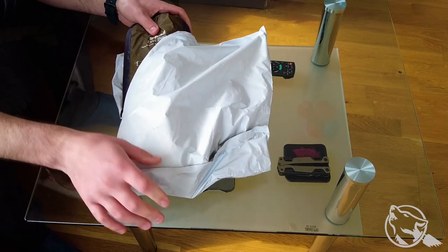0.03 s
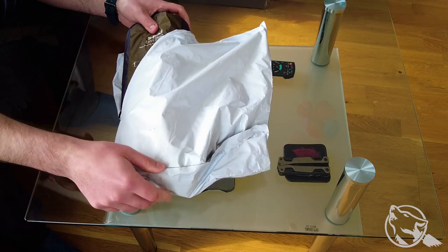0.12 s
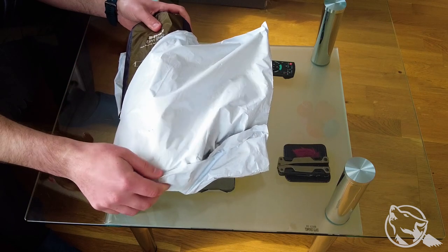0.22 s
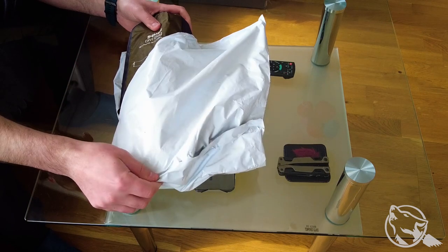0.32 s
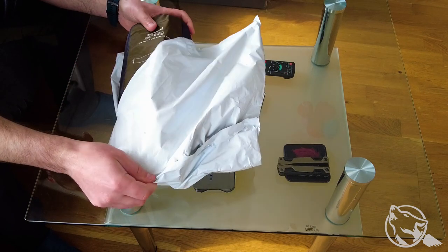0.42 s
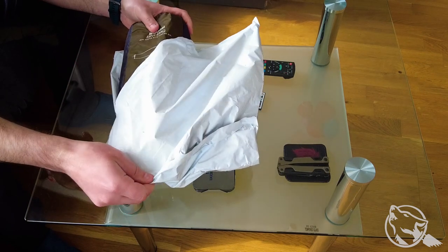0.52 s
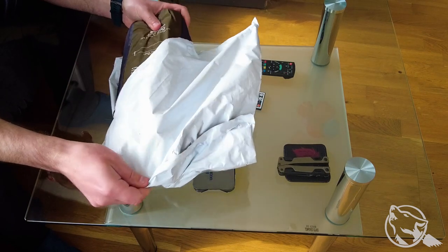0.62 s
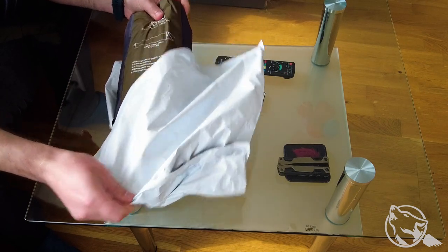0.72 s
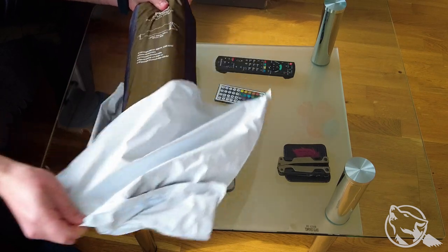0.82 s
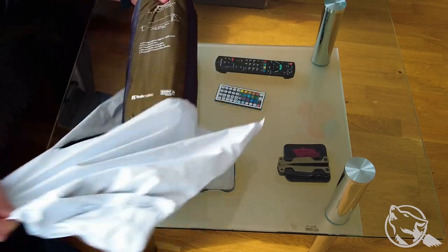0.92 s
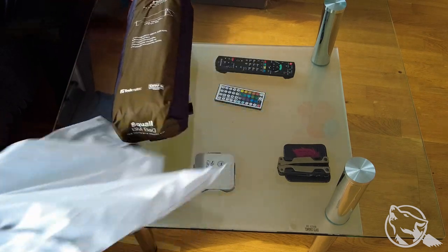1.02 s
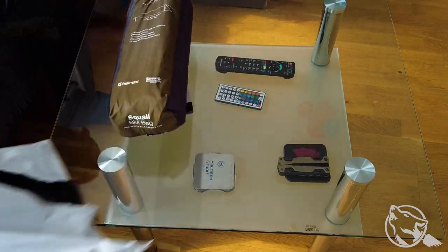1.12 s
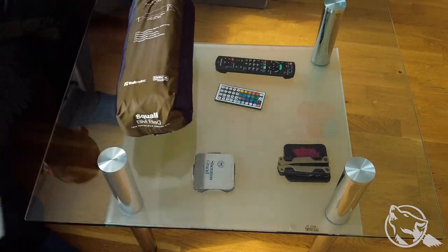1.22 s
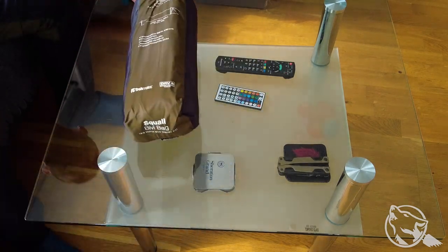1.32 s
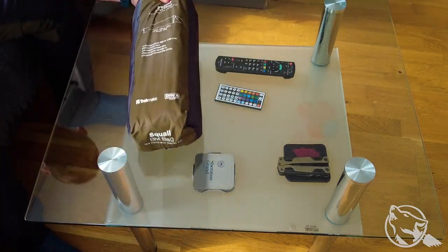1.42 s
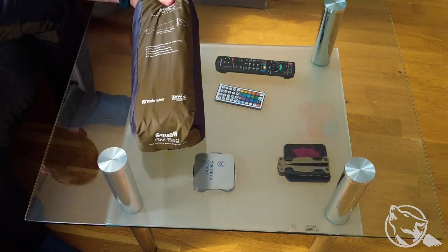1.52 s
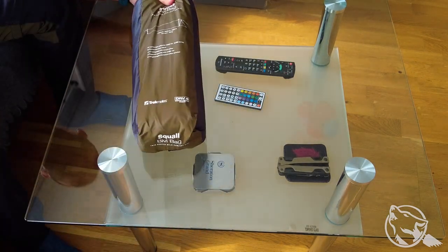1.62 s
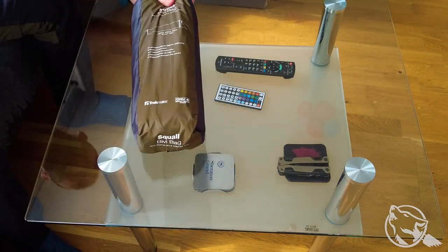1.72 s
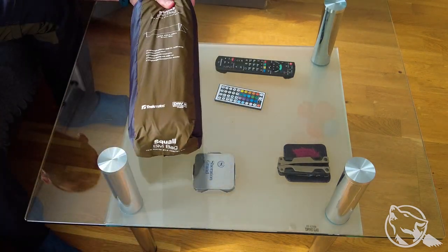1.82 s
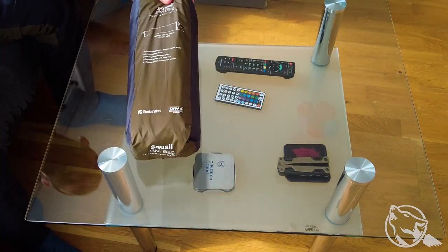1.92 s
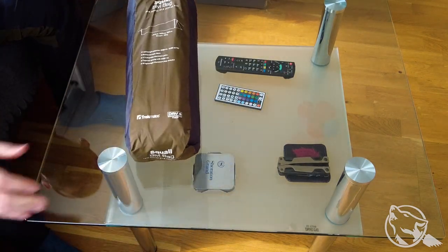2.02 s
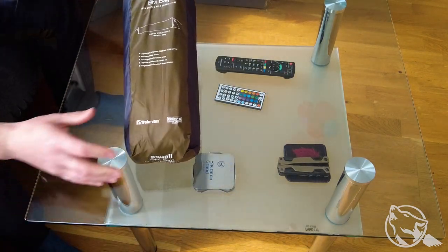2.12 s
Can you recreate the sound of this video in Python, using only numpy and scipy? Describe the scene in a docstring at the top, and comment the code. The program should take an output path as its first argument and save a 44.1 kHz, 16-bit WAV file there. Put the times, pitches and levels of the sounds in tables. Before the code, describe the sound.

Thin plastic mailer film rustles faintly at first, then from 0.2 seconds crinkles in dense bright crackles and sharp creasing snaps. It slides free with a smoother, louder swish around 0.9 to 1.1 seconds, with a soft bump, then fades by 1.4. Fabric rubs lightly from 1.5, with a crisp scuff and dull knocks near 1.85 and a faint touch at 2.15. Close, quiet room, low hum and rumble.

```python
"""Unwrapping a packed bag

A thin plastic mailer is pulled off a packed fabric bag on a glass table in a living room.
The film slides with a hiss and crackle made of random pops; creases snap through as short ringing clicks,
and folds collapse in quick clusters of pops. The mailer comes free, with a smoother swish.
The fabric bag rubs in short grainy strokes and bumps with soft, damped knocks.
The room adds a brief fading ring, over quiet air, a low hum and swells of deep rumble.
"""
import sys
import numpy as np
from scipy import signal
from scipy.fft import rfft, irfft
from scipy.io import wavfile

SR = 44100
rng = np.random.default_rng(int(sys.argv[2]) if len(sys.argv) > 2 else 0)


def put_to_file(sound):
    """Save the sound as 16-bit audio at rate SR, in the file named by the first command-line argument."""
    columns = np.atleast_2d(sound).T  # one column per channel
    safe = np.clip(columns, -1, 1)
    whole_steps = np.round(safe * 32767)
    wavfile.write(sys.argv[1], SR, whole_steps.astype(np.int16))


N = 97020  # length in samples: 2.2 s


def undb(db):
    """Turn decibels into a plain gain."""
    return 10 ** (np.asarray(db) / 20)


def unit(x):
    """Scale to an rms (average strength) of 1."""
    return x / np.sqrt(np.mean(x ** 2) + 1e-20)


def octaves(n):
    """Log2 frequency of each bin of an n-sample spectrum."""
    return np.log2(np.maximum(np.arange(n // 2 + 1) * SR / n, 1))


def curve(points, n):
    """Read a (Hz, dB) table as a gain in dB for each bin."""
    hz, db = np.array(points, float).T
    return np.interp(octaves(n), np.log2(hz), db)


def shape(x, db):
    """Filter with the given gain in each bin, without any sound ahead of its cause (minimum phase)."""
    n = len(x)
    cepstrum = irfft(np.log(undb(db)), n)
    # fold the backward half onto the forward half
    cepstrum[1:n // 2] *= 2
    cepstrum[n // 2 + 1:] = 0
    return irfft(rfft(x) * np.exp(rfft(cepstrum)), n)


def add(out, start, x):
    """Mix a short sound in at a time in seconds."""
    i = int(np.clip(start * SR, 0, N - 1))
    out[i:i + len(x)] += x[:N - i]


def pops(n, per_s, spread_db):
    """Random impulses, many small and a few large."""
    chance = rng.random(n)
    size = np.minimum(rng.exponential(size=n), 4.5)
    sign = rng.choice([-1, 1], n)
    return unit((chance < per_s / SR) * sign * undb(spread_db * size))


def catching(t, depth_db):
    """Gain of a surface that catches and slips unevenly: a random level every few milliseconds."""
    step_s = 0.007
    steps = np.arange(0, N / SR, step_s)
    wobble = np.clip(rng.standard_normal(len(steps)), -2, 2)
    return undb(depth_db * np.interp(t, steps, wobble))


CRACKLE_PER_S = 1500  # pops per second, all bands together


def crackle(n, spread_db, count=9):
    """Facets of several sizes pop independently, each size ringing in its own band."""
    centres_hz = np.linspace(1000, 10500, count)
    bin_hz = 2 ** octaves(n)
    rings = [1 + 12 * np.exp(-((bin_hz - hz) / 900) ** 2) for hz in centres_hz]
    total = np.sqrt(sum(ring ** 2 for ring in rings))  # keeps the combined colour even
    out = np.zeros(n)
    for ring in rings:
        facet_pops = pops(n, CRACKLE_PER_S / count, spread_db)
        out += shape(facet_pops, 20 * np.log10(ring / total))
    return out


# How fast the film slides over the bag, given as a loudness that glides from row to row.
# Each row: time in seconds, level in dB before the catching and the loss of treble.
SLIDE_LEVELS = [(0,-54),(.04,-50.5),(0.201,-59),(0.224,-47),(.28,-47.5),(.37,-47),(0.471,-46),(0.548,-39.5),(.60,-48.5),(.68,-45.5),(.73,-39),(.80,-44.5),(.85,-43),(.92,-43),(1.0,-41),(1.089,-39),(1.17,-52.5),(1.301,-60),(1.47,-67.5)]
# Tone colour of the plastic film, also used for its collapsing folds. Each row: frequency in Hz, gain in dB.
FILM_COLOUR = [(59, -8.5), (100, -3.5), (177, -2.5), (275, 2.5), (589, -3), (640, -2), (712, -1.5),
               (774, -0.5), (1840, -1), (3320, -6.5), (7250, -4), (9150, -9), (10800, -18.5),
               (12800, -18.5), (15500, -28)]
CRACKLE_DB, CRACKLE_SPREAD_DB, HISS_DB = -2.5, 3.5, -4  # mix of crackle and hiss, before rescaling
FREE_S, FREE_FADE_S, FREE_GRAIN = 0.87, 0.044, 0.57  # once clear of the bag the film has less grain
DULL_HZ, DULL_SLOPE_DB = 4000, -3.5  # slow film loses treble above this, in dB per octave
DULLEST_DB, BRIGHTEST_DB = -66.5, -52.5  # slide levels where the film is fully dull and fully bright
FILM_CATCH_DB = 2.1


def sliding(t):
    """The moving film hisses and crackles in step with its speed, brighter when fast and smoother once free."""
    times, levels = np.array(SLIDE_LEVELS).T
    db = np.interp(t, times, levels, right=-120)  # all but silent after the last row
    grip = 1 - (1 - FREE_GRAIN) * np.clip((t - FREE_S) / FREE_FADE_S, 0, 1)
    grain, hiss = grip * undb(CRACKLE_DB), undb(HISS_DB)
    rustle = grain * crackle(N, CRACKLE_SPREAD_DB) + hiss * rng.standard_normal(N)
    rustle /= np.hypot(grain, hiss)  # less grain does not mean less loud
    bright = unit(shape(rustle, curve(FILM_COLOUR, N)))
    dull = shape(bright, DULL_SLOPE_DB * np.maximum(octaves(N) - np.log2(DULL_HZ), 0))
    fast = np.clip((db - DULLEST_DB) / (BRIGHTEST_DB - DULLEST_DB), 0, 1)
    film = fast * bright + (1 - fast) * dull
    return undb(db) * catching(t, grip * FILM_CATCH_DB) * film


# Single creases snapping through. Each row: start in seconds, level in dB (energy spread over one
# millisecond, before the trim), ring frequency in Hz, half bandwidth in octaves.
CREASE_SNAPS = [(0.0818,-47,5460,0.36),(0.0998,-35.5,7500,0.46),(0.1532,-36.5,5200,0.2),(0.2338,-30.5,2180,0.34),(0.2374,-34.5,2400,2.5),(.2718,-39,7500,0.3),(0.3033,-36,6000,1.4),(0.3105,-30.5,6500,2.1),(.3312,-30,8000,0.21),(.340,-32,7000,0.75),(0.3514,-30.5,7500,0.46),(0.3577,-30.5,4970,1.7),(0.427,-32.5,5630,.3),(0.4333,-31.5,3000,2.6),(0.451,-24,6560,0.75),(0.451,-28,2190,0.64),(0.455,-35,7660,0.25),(0.4666,-30.5,1980,2.1),(0.4774,-26,7060,0.26),(.4953,-25,6600,.5),(0.4963,-29.5,2100,0.44),(.520,-25.5,5600,.5),(0.527,-31,5900,0.42),(0.5595,-29.5,8060,.25),(.5744,-34.5,7800,.5),(0.5825,-34,7200,0.82),(0.6057,-31.5,1900,0.41),(0.6633,-29,5600,0.96),(0.6935,-29,9000,0.56),(.744,-28.5,5000,2),(0.763,-28.5,6000,1.6),(0.7696,-31.5,6540,0.61),(.821,-30,6700,0.64),(.831,-29.5,1900,0.38),(.8394,-25.5,6550,0.81),(.9554,-31,5350,0.22),(0.9646,-36,5950,1.5),(0.9729,-18.5,7800,0.66),(1.0435,-32,6000,1.4),(1.1,-23.5,5800,0.85),(1.135,-28.5,4400,0.25),(1.2295,-42.5,3220,0.4),(1.2372,-39,9700,0.42),(1.3201,-45,2740,0.79),(1.3853,-52,4900,0.28),(1.6421,-46.5,8500,.6),(1.833,-38,6040,1.3),(1.850,-31,2000,.4),(1.857,-33.5,2000,0.52),(1.8795,-30.5,5970,0.65)]
# Tone colour shared by all the snaps. Each row: frequency in Hz, gain in dB.
CREASE_COLOUR = [(100,16),(300,0),(1800,3),(3200,-1),(5500,-3),(8500,-3),(10500,-12.5),(15500,-15.5)]
SNAP_TRIM_DB, SNAP_SKIRT_DB = -0.5, -19.5  # the skirt is the level outside the ringing band
SNAP_FLUTTER, SNAP_DECAY_S = 0.37, 0.00052


def snaps(size=2048):
    """Each crease flips with a click and a millisecond of flutter in the band of its own facet."""
    out, t = np.zeros(N), np.arange(size) / SR
    for start, db, hz, width in CREASE_SNAPS:
        push = SNAP_FLUTTER * rng.standard_normal(size) * np.exp(-t / SNAP_DECAY_S)
        push[0] = 1  # the click itself
        away = (octaves(size) - np.log2(hz)) / width
        band = 1 / (1 + away ** 4) + undb(SNAP_SKIRT_DB)
        click = shape(push, curve(CREASE_COLOUR, size) + 20 * np.log10(band))
        click *= np.sqrt(SR / 1000) / np.linalg.norm(click)  # energy of one millisecond at rms 1
        add(out, start, click * undb(db + SNAP_TRIM_DB))
    return out


# Folds collapsing in a cluster of crackles. Each row: centre in seconds, half length in seconds,
# level in dB at the top of the swell before the trim, treble tilt in dB per octave above 1000 Hz.
FOLD_CRUMPLES = [(.026,.012,-59,-17),(.225,0.0058,-39,0.5),(.237,0.0059,-34,-1),(.304,0.0032,-41,-10),(0.353,0.0084,-39,0),(0.424,0.0025,-35,0),(0.435,0.0026,-37,-1),(0.525,0.016,-37,2),(.638,.011,-44,4.5),(0.719,0.0049,-33.5,3),(.733,0.012,-37.5,-1),(.764,0.0039,-27.5,1.5),(0.83,0.0039,-31,2),(0.842,0.0094,-35,1.5),(0.861,0.017,-33.5,1.5),(0.97,0.011,-29,2),(0.9735,0.0015,-22.5,2),(1.106,0.0032,-32,5),(1.137,0.0057,-36.5,0),(1.232,0.0033,-45.5,-3.5),(1.400,0.0039,-45,-1),(1.549,0.0037,-50,-8.5),(1.848,0.0042,-30.5,6.5)]
CRUMPLE_TRIM_DB, CRUMPLE_SPREAD_DB = -3, 2


def crumples(size=8192):
    """A fold gives way in a quick swell of crackles."""
    out, t = np.zeros(N), (np.arange(size) - size / 2) / SR
    for centre, half, db, tilt_db in FOLD_CRUMPLES:
        swell = np.exp(-(t / half) ** 2)
        tilt = tilt_db * np.maximum(octaves(size) - np.log2(1000), 0)
        swelling_pops = swell * pops(size, per_s=2800, spread_db=CRUMPLE_SPREAD_DB)
        burst = unit(shape(swelling_pops, curve(FILM_COLOUR, size) + tilt))
        burst *= np.sqrt(np.mean(swell ** 2))
        add(out, centre - size / 2 / SR, burst * undb(db + CRUMPLE_TRIM_DB))
    return out


# The fabric bag rubbing on hand and table. Each row: start in seconds, attack in seconds,
# hold in seconds, decay in seconds, level in dB before the trim and the catching.
RUB_STROKES = [(1.523,.002,0.033,0.075,-58),(1.637,0.032,0.043,0.042,-49),(1.792,0.001,0.022,0.031,-44),(1.828,0.018,0.014,0.023,-39.5),(1.872,0.013,0.024,0.034,-42.5),(1.965,0.022,0.029,.08,-64),(2.15,0.0023,0.031,0.056,-60.5)]
# Tone colour of the rubbed fabric. Each row: frequency in Hz, gain in dB.
FABRIC_COLOUR = [(80,-3),(150,-7),(330,-3),(470,-10.5),(850,-1.5),(1200,-7),(2000,-3.5),(3400,-9.5),(6000,-8),(9000,-13),(11000,-22.5),(15500,-26.5)]
RUB_TRIM_DB, RUB_SPREAD_DB, RUB_CATCH_DB = -4.5, 3, 2


def rubs(t):
    """Short strokes of finely grained fabric friction."""
    effort = np.zeros(N)
    for start, attack, hold, decay, db in RUB_STROKES:
        rise = np.clip((t - start) / attack, 0, 1)
        fall = np.exp(-np.maximum(t - start - attack - hold, 0) / decay)
        effort += undb(db) * rise * fall
    grains = pops(N, per_s=3500, spread_db=RUB_SPREAD_DB)
    friction = unit(shape(grains, curve(FABRIC_COLOUR, N)))
    return undb(RUB_TRIM_DB) * effort * catching(t, RUB_CATCH_DB) * friction


# Soft knocks of the bag. Each row: start in seconds, peak level in dB, body frequency in Hz,
# decay of the scuff in seconds.
BAG_KNOCKS = [(.231,-34.5,237,0.0083),(0.972,-38.5,123,0.012),(1.102,-35.5,228,0.027),(1.3963,-41,260,0.0068),(1.833,-36,116,0.018),(1.848,-42.5,106,.02),(1.902,-39.5,91,0.015),(2.1485,-42.5,217,0.0064)]
KNOCK_WIDTH_OCT, KNOCK_SLOPE_DB = 0.94, 11.5  # far from the body frequency, dB lost per such width
KNOCK_SCUFF = 0.045


def knocks(size=8192):
    """The padded bag bumps: a dull, heavily damped push with a scuff."""
    out, t = np.zeros(N), np.arange(size) / SR
    for start, db, hz, decay in BAG_KNOCKS:
        push = KNOCK_SCUFF * rng.standard_normal(size) * np.exp(-t / decay)
        push[0] = 1  # the bump itself
        away = (octaves(size) - np.log2(hz)) / KNOCK_WIDTH_OCT
        thud = shape(push, -KNOCK_SLOPE_DB * np.sqrt(1 + away ** 2))
        add(out, start, thud / np.abs(thud).max() * undb(db))
    return out


# How the room rings, band by band. Each row: band centre in Hz, time to fade by 60 dB in seconds,
# level in dB before the noise is split into bands.
ROOM_BANDS = [(150,0.38,-9),(484,0.64,-5.5),(1480,0.77,-12),(3900,0.36,-12.5),(8000,0.76,-15.5),(14000,.33,-11.5)]
ROOM_GAP_S = 0.0044  # pause before the first reflection


def room(x, size=32768):
    """Diffuse reflections: bands of noise, each fading at its own rate."""
    t, tail = np.arange(size) / SR, np.zeros(size)
    noise = rfft(rng.standard_normal(size))
    centres = np.log2([row[0] for row in ROOM_BANDS])
    # each row of the identity matrix picks one band, cross-faded into its neighbours
    for own, (hz, t60, db) in zip(np.eye(len(ROOM_BANDS)), ROOM_BANDS):
        fade = (t > ROOM_GAP_S) * np.exp(-np.log(1000) * t / t60)
        band = irfft(noise * np.interp(octaves(size), centres, own), size)
        tail += undb(db) * band * fade / np.linalg.norm(fade)
    return signal.fftconvolve(x, tail)[:N]


# Swells of deep rumble. Each row: centre in seconds, half length in seconds, level in dB at the top.
RUMBLE_SWELLS = [(.08,0.079,-48.5),(0.23,0.032,-51),(0.422,0.082,-44),(0.69,0.065,-49),(.95,.15,-50.5),(1.635,0.075,-44.5),(1.718,0.045,-47)]
# Tone colour of the rumble. Each row: frequency in Hz, gain in dB.
RUMBLE_COLOUR = [(8,-3.5),(20,8.5),(32,-2.5),(60,-25),(150,-31),(600,-107)]
# Tone colour of the room air. Each row: frequency in Hz, gain in dB.
AIR_COLOUR = [(20,-0.5),(60,-3),(120,-25),(400,-22),(2000,-28.5),(8000,-35.5),(16000,-53)]
AIR_DB, HUM_HZ, HUM_DB = -61, 49.3, -62.5  # rms levels


def background(t):
    """Room air and deep rumble from filtered noise, with a low hum from a sine."""
    swell = sum(undb(db) * np.exp(-((t - centre) / half) ** 2) for centre, half, db in RUMBLE_SWELLS)
    rumble = unit(shape(rng.standard_normal(N), curve(RUMBLE_COLOUR, N)))
    air = unit(shape(rng.standard_normal(N), curve(AIR_COLOUR, N)))
    hum = np.sqrt(2) * np.sin(2 * np.pi * HUM_HZ * t)
    return swell * rumble + undb(AIR_DB) * air + undb(HUM_DB) * hum


def scene():
    """Mailer and bag close by, in the room."""
    t = np.arange(N) / SR
    near = sliding(t) + snaps() + crumples() + rubs(t) + knocks()
    return (near + room(near) + background(t))[None]


TOP_HZ = 15900


def record(dry):
    """A steep low-pass filter removes the very top of the treble."""
    low_pass = signal.ellip(10, .2, 80, TOP_HZ, fs=SR, output="sos")  # ripple 0.2 dB, stop 80 dB
    return signal.sosfilt(low_pass, dry)


dry = scene()
out = record(dry)
put_to_file(out)
```